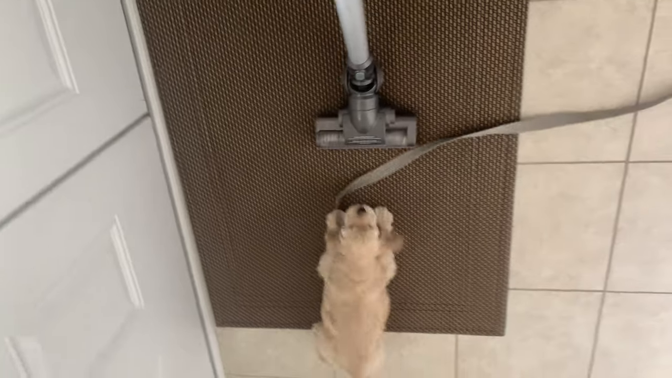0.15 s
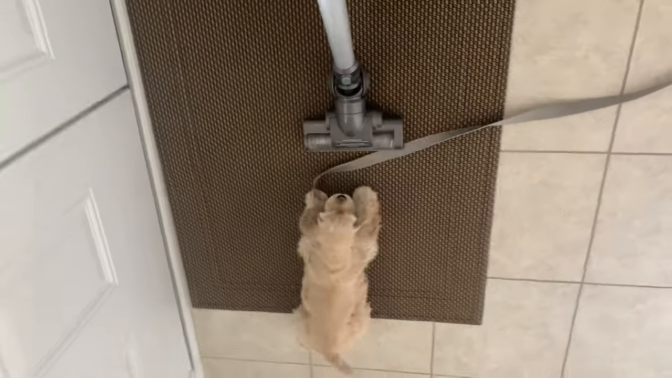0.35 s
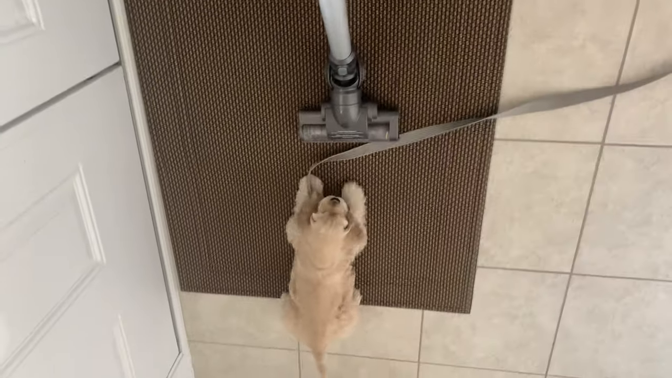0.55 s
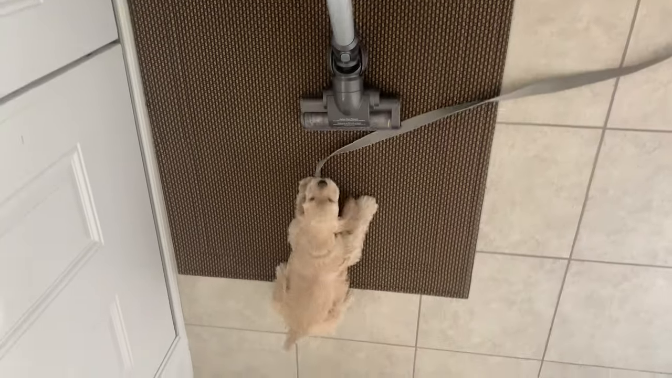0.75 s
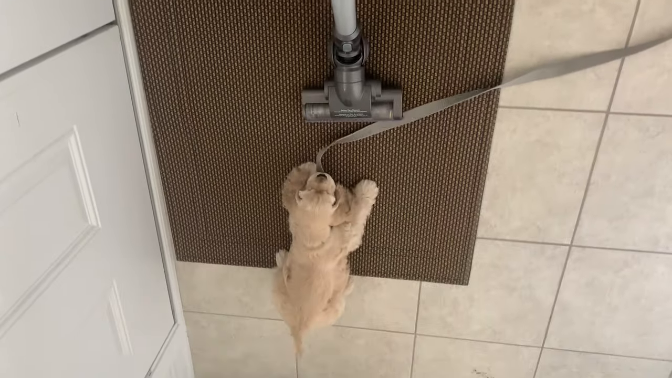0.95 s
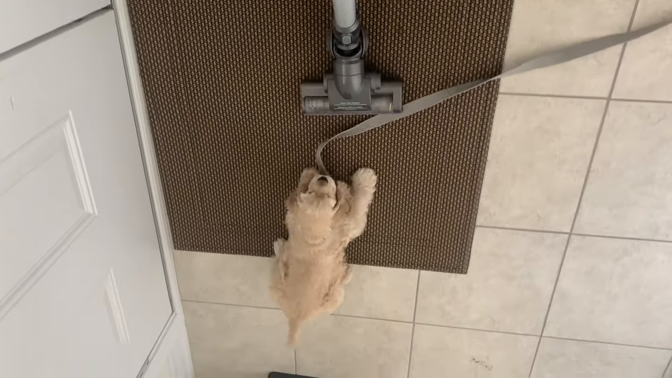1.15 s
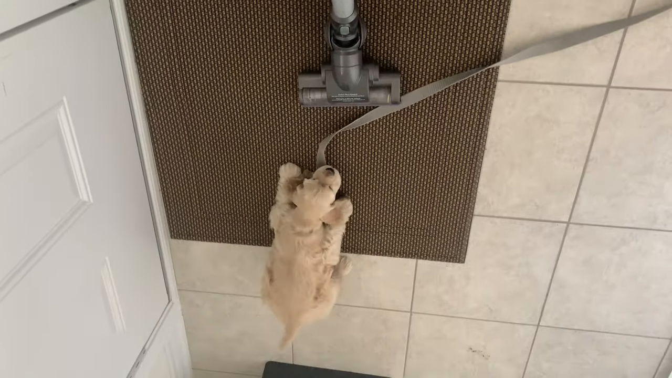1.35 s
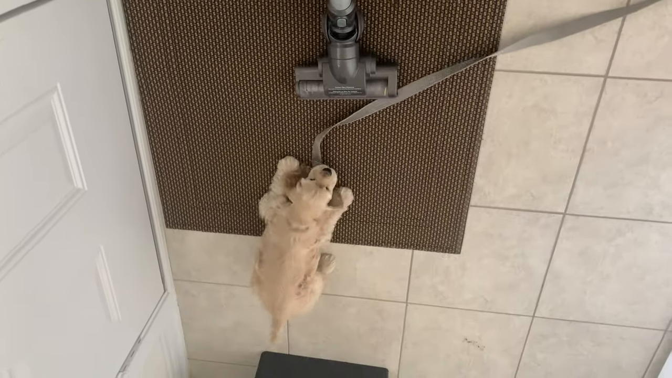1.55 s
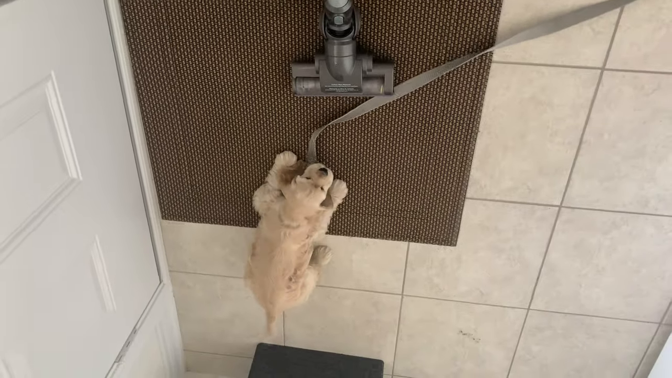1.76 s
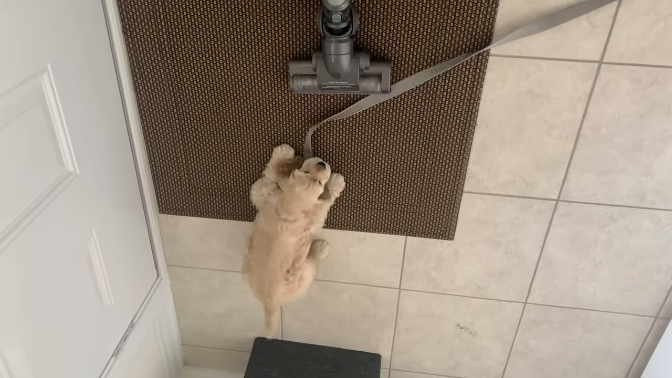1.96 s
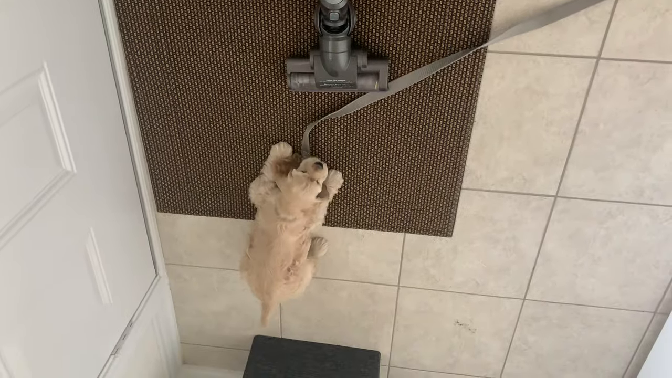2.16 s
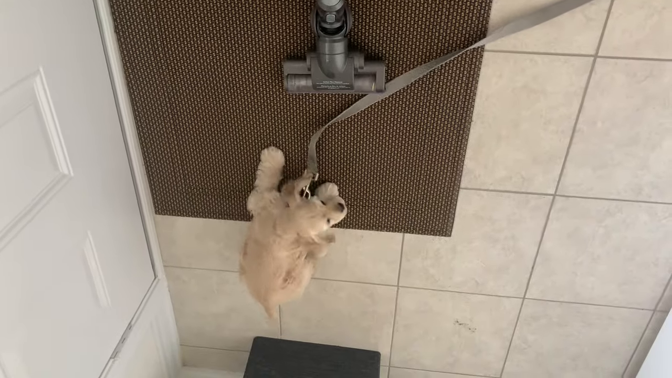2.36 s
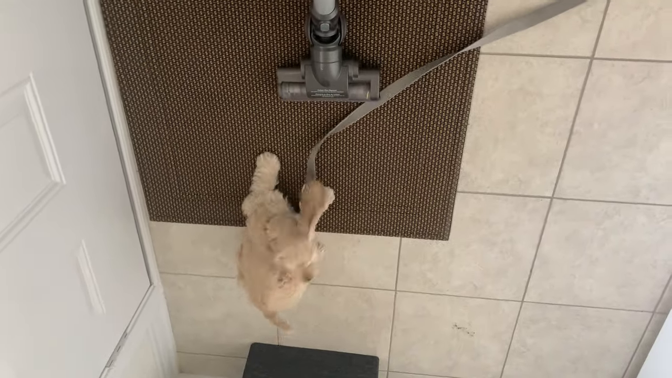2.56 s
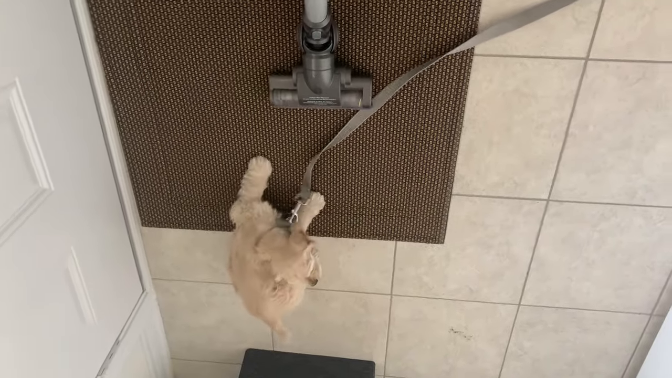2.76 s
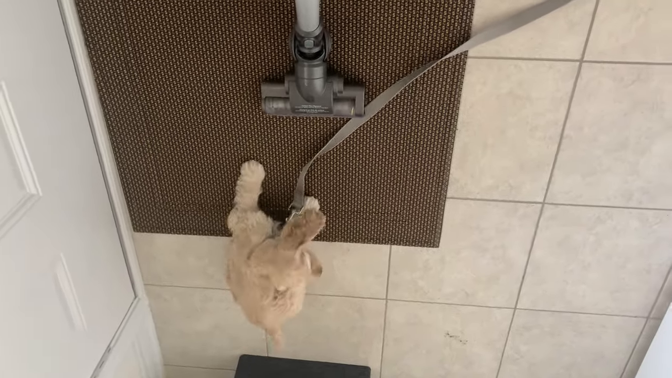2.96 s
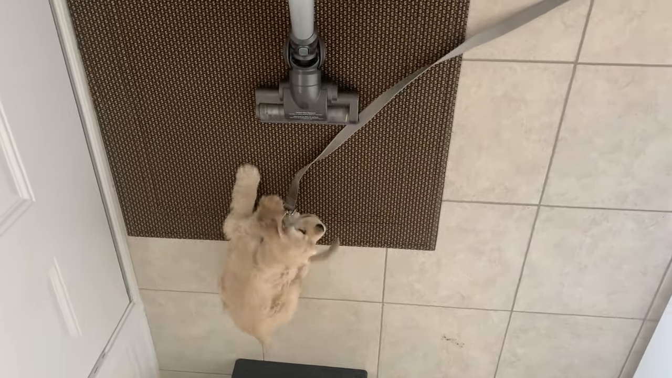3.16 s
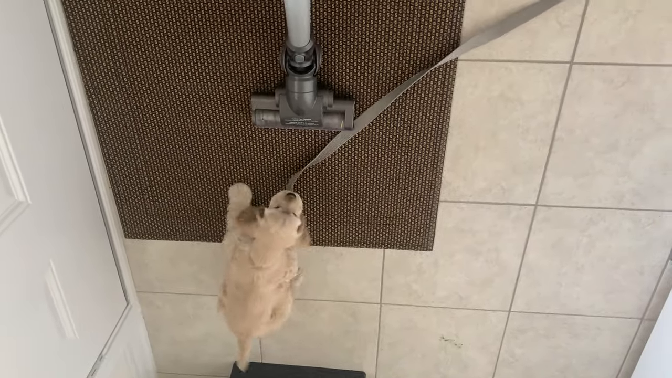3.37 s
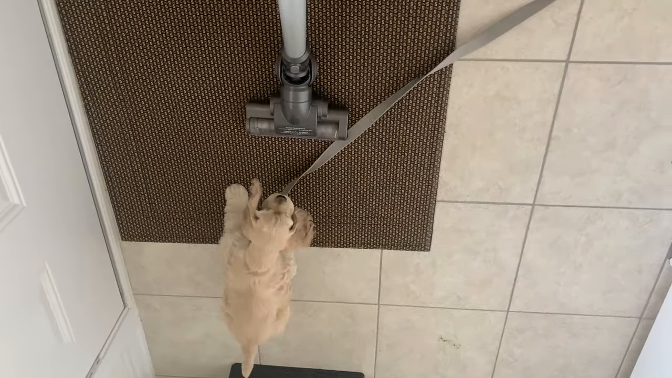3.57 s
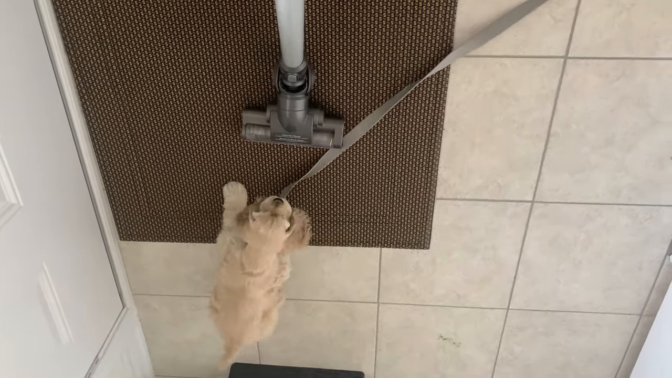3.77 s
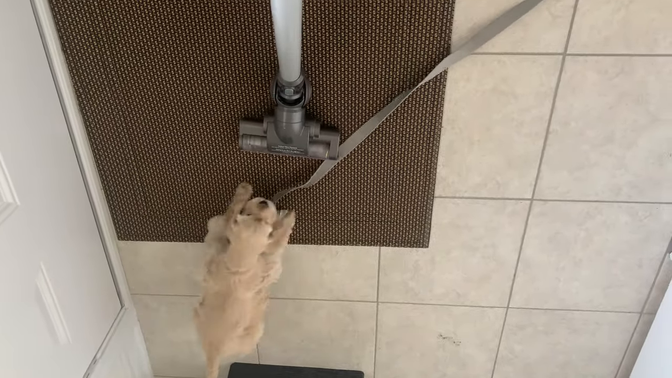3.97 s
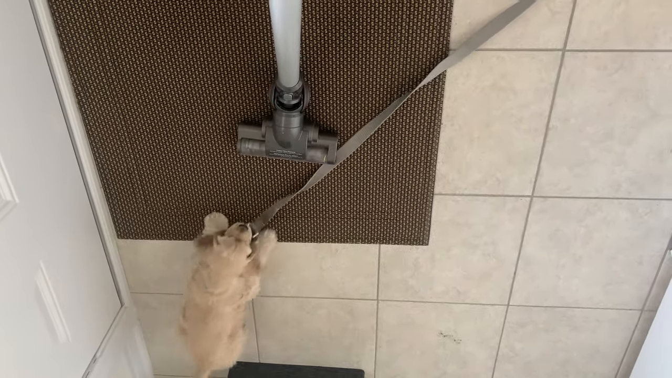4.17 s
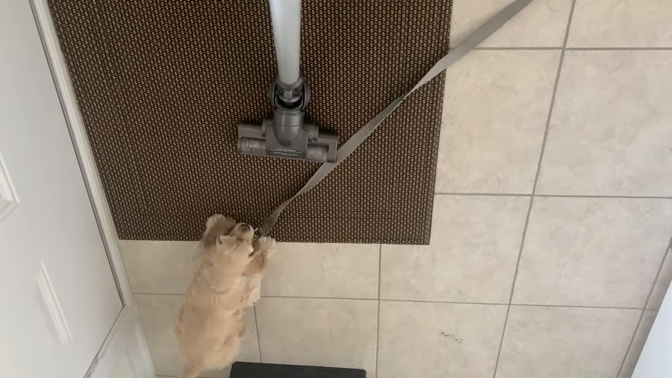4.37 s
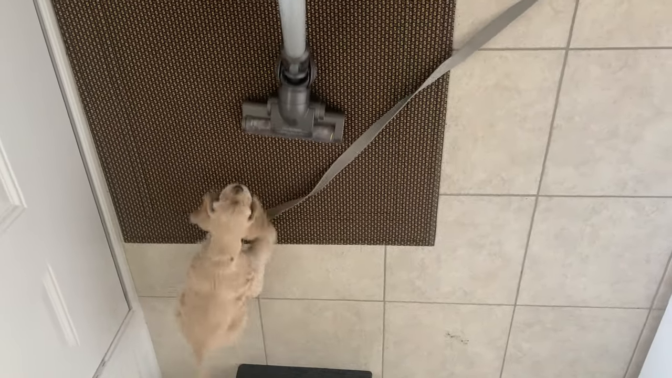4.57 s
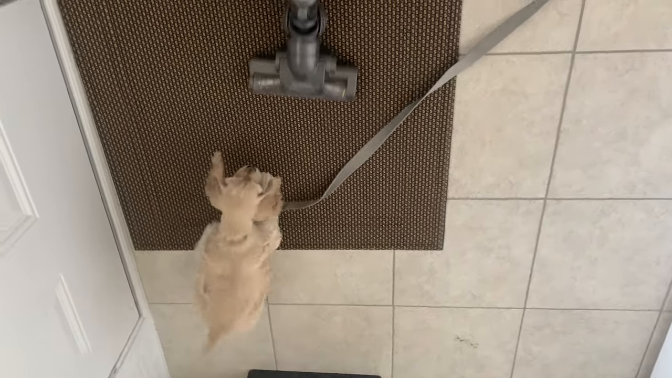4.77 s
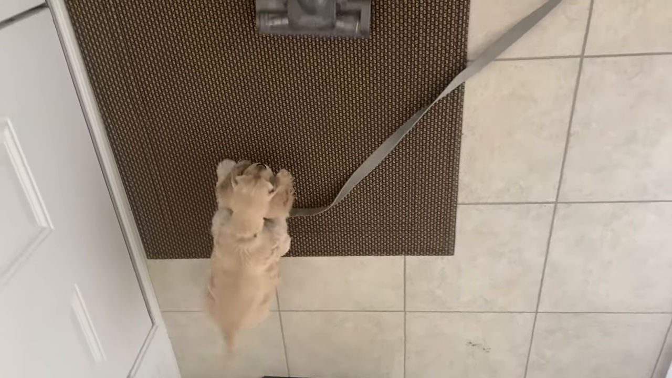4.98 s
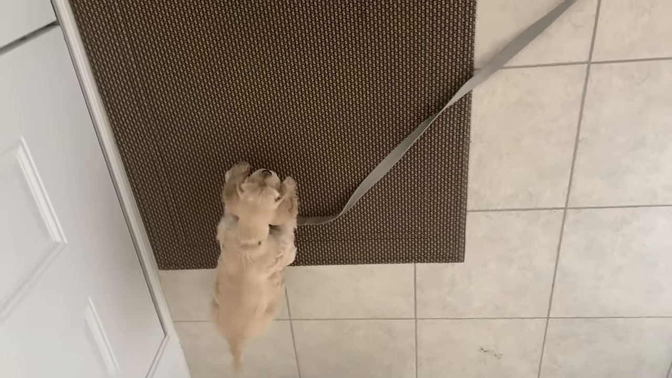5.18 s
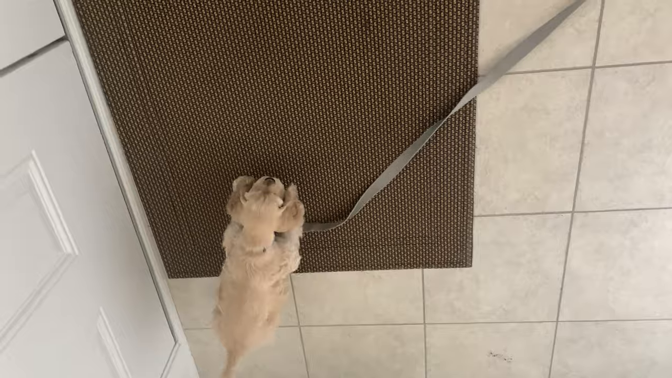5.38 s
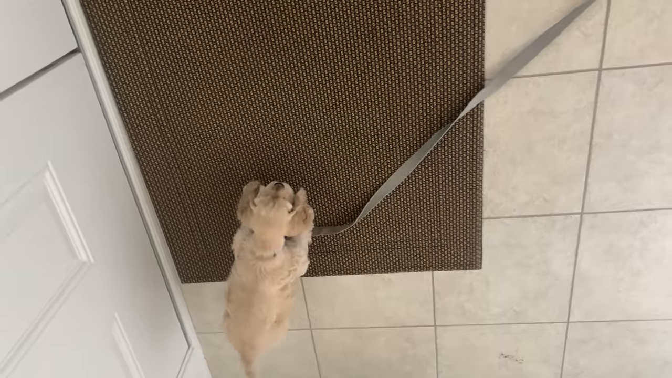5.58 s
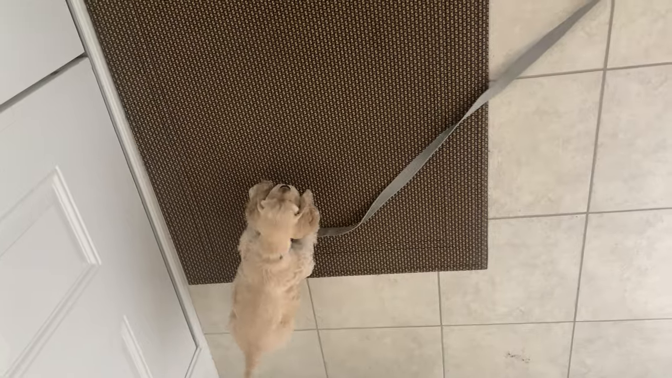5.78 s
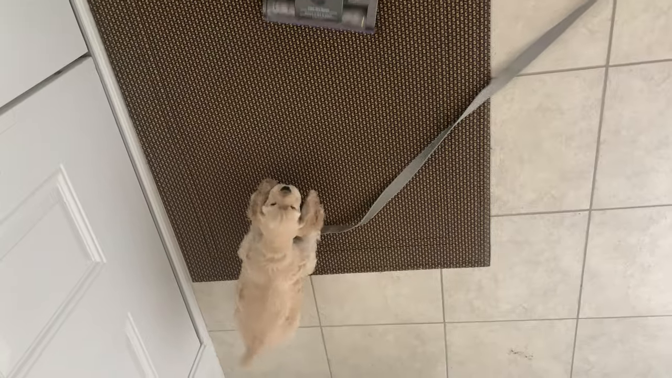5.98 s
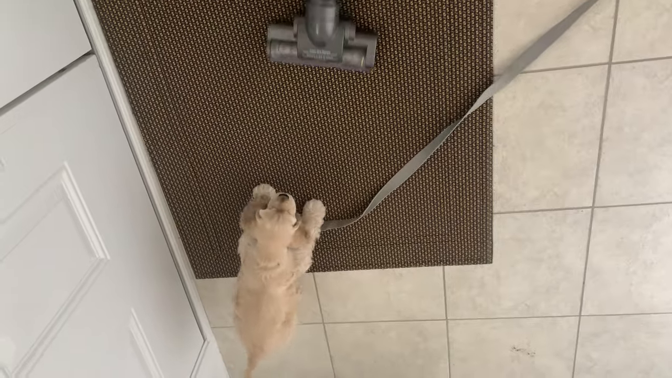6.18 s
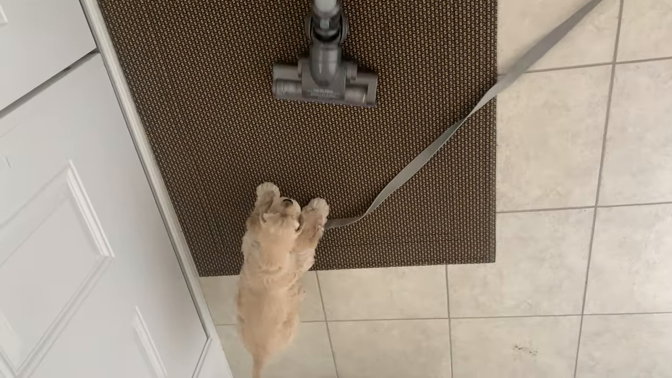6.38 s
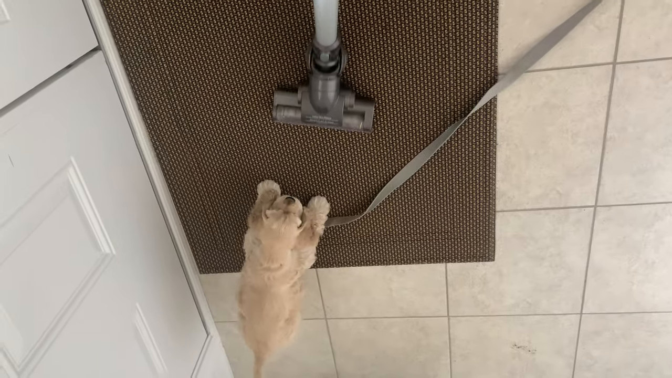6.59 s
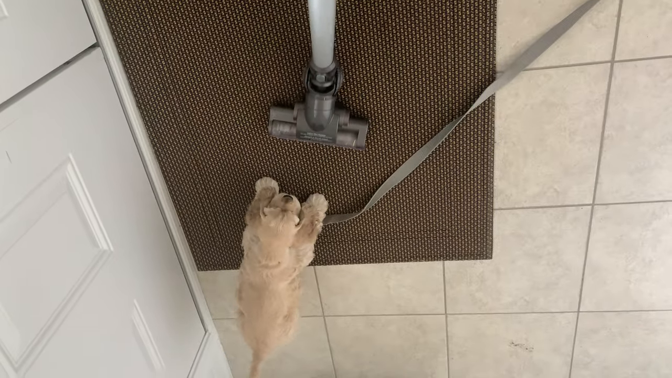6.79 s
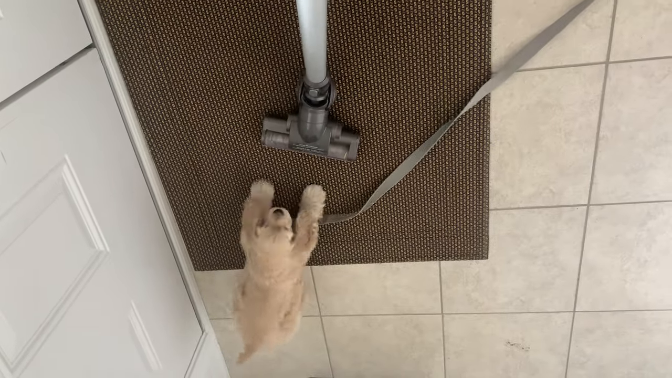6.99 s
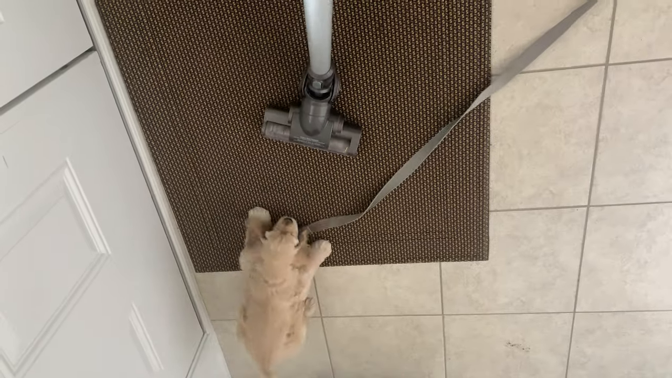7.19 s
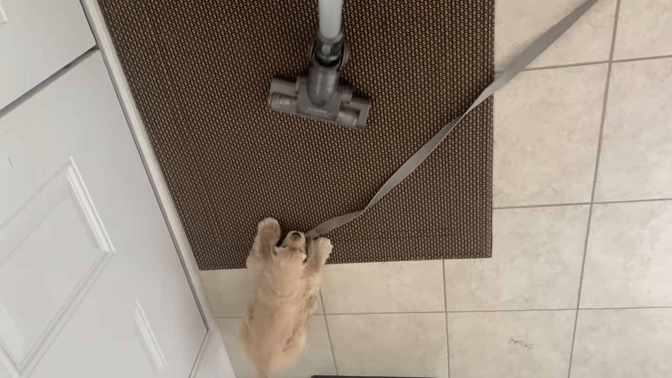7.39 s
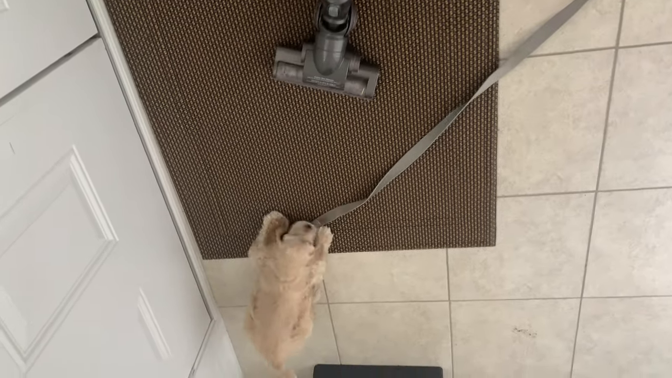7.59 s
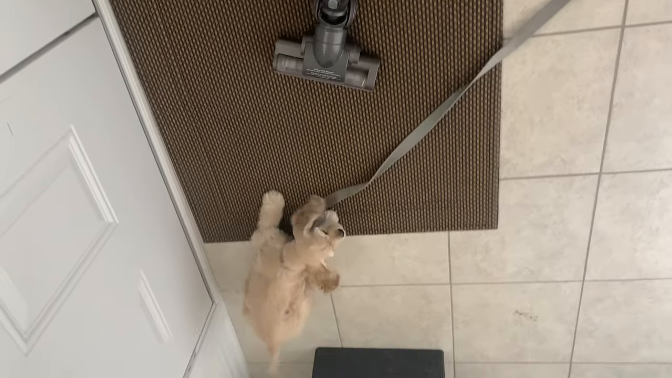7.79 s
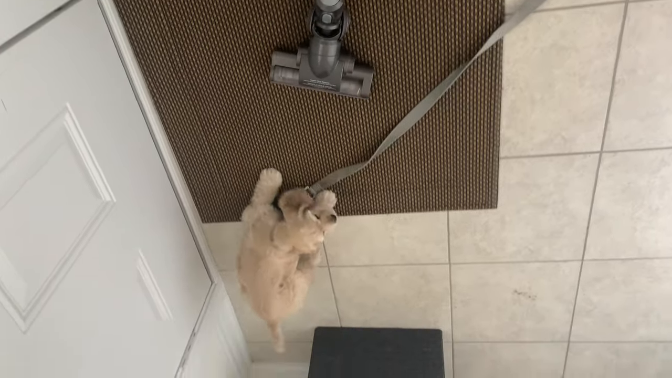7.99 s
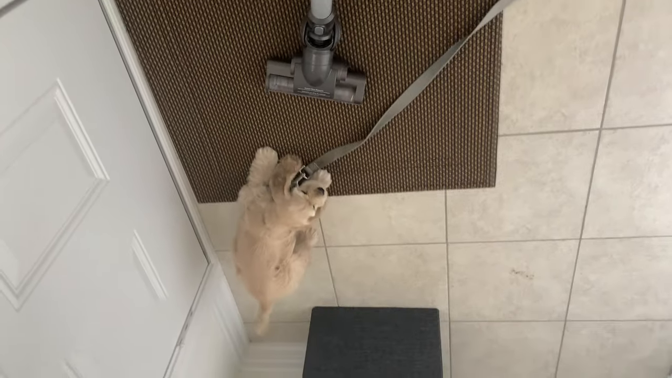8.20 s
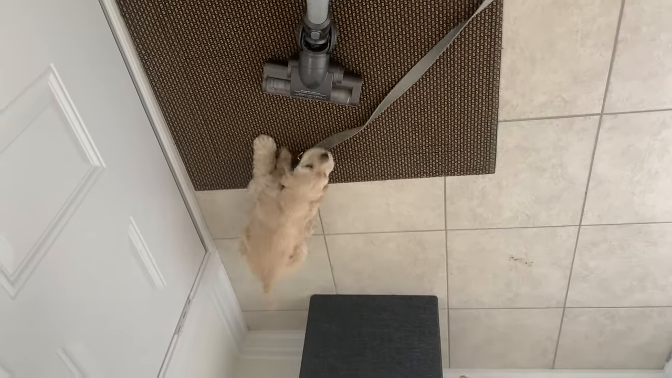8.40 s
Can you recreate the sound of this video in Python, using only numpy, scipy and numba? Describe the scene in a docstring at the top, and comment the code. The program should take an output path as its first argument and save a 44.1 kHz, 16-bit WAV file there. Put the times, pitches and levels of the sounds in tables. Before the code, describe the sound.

A young dog yaps at a running vacuum indoors. The yaps are very short, high and hoarse, rising fast then dropping, loud above the machine, with a brief hard-walled echo. The vacuum's high hiss and faint whine never stop; they surge around four and seven seconds and thin out between. Faint low drones mark the nozzle dragging on the mat. Phone stereo, moderately close.

```python
"""A small tiled hallway, where a puppy yaps eleven times at a running vacuum cleaner.
Each yap is an uneven pulse train filtered by moving resonances of throat and mouth; the walls ring after it.
Shaped noise gives the air hissing into the floor nozzle as it is pushed near and drawn back, and the motor's
roar further off; sines give the whine of the fan and the hum of the motor, and narrow noise the dragging nozzle.
A phone's stereo pair hears it all with a phase and level difference for each source."""
import sys
import numpy as np
from scipy import signal
from scipy.fft import rfft, irfft, next_fast_len
from scipy.io import wavfile
from scipy.ndimage import uniform_filter1d
from numba import njit

SR = 44100
rng = np.random.default_rng(int(sys.argv[2]) if len(sys.argv) > 2 else 0)


def master(y):
    """Save y as 16-bit WAV."""
    cut = np.clip(np.atleast_2d(y).T, -1, 1)
    pcm = np.round(cut * 32767)  # scale
    wavfile.write(sys.argv[1], SR, pcm.astype(np.int16))


N = 372204
TIME = np.arange(N) / SR  # s
OPPOSITE = np.array([[1], [-1]])  # signs of a left-right difference


def undb(db):
    """Logarithmic level: decibels to an amplitude gain."""
    return 10 ** (np.asarray(db) / 20)


def unit(x):
    """Normalisation: scale to rms 1."""
    return x / np.sqrt(np.mean(x ** 2))


def walk(rate):
    """Slow random modulation: levels held 1 / rate s, smoothed by two moving averages, at rms 1."""
    hold = int(SR / rate)
    steps = np.repeat(rng.standard_normal(N // hold + 1), hold)
    smooth = uniform_filter1d(uniform_filter1d(steps, hold), hold)
    return unit(smooth[:N])


def coloured(points):
    """Spectral shaping: Gaussian noise of rms 1 whose density follows (frequency [Hz], level [dB]) points."""
    hz, db = np.transpose(points)
    f = np.fft.rfftfreq(next_fast_len(N + N % 2) * 2, 1 / SR) + 1  # 1 Hz up, to keep the logarithm finite
    gain = undb(np.interp(np.log(f), np.log(hz), db))
    spectrum = rng.standard_normal(len(f)) + 1j * rng.standard_normal(len(f))
    return unit(irfft(gain * spectrum)[:N])


def butter(x, hz, kind, order=2):
    """Maximally flat filtering: a Butterworth low-pass or high-pass."""
    sos = signal.butter(order, min(hz, SR / 2 - 1), kind, fs=SR, output="sos")
    return signal.sosfilt(sos, x)


@njit
def resonate(x, hz, width):
    """Damped resonance: a state-variable band-pass with moving centre and width, gain 1 at the centre."""
    y, b, l = np.empty(len(x)), 0., 0.
    for i in range(len(x)):
        g, damping = np.tan(np.pi * hz[i] / SR), width[i] / hz[i]
        v = (b + g * (x[i] - l)) / (1 + g * (g + damping))
        b, l, y[i] = 2 * v - b, l + 2 * g * v, damping * v
    return y


def band(x, hz, width_hz):
    """Damped resonance whose centre and width are constants or curves."""
    return resonate(x, hz * np.ones(len(x)), width_hz * np.ones(len(x)))


def steady(x, span_s=0.0096):
    """Envelope normalisation: hold the short-term rms at 1, keeping the faster grain."""
    power = np.abs(uniform_filter1d(x ** 2, int(span_s * SR)))
    return x / np.sqrt(power + 1e-12)


def formant(source, hz, width_hz):
    """Resonance of an air passage: two equal band-passes in cascade for steep sides, at rms 1."""
    return steady(band(band(source, hz, width_hz), hz, width_hz))


def airflow(points, apart):
    """Turbulence noise with partial coherence: the bass is alike on both sides, the rest partly differs."""
    middle = coloured(points)
    side = butter(coloured(points), 260, "high", order=1)
    return unit(middle + apart * side * OPPOSITE)


def hallway(x, direct_db=-3.0, early_db=-9, early_t60=0.028, tail_db=-8.0, t60=0.65,
            echo_db=-11, echo_s=0.052, echo_t60=0.4, apart=0.81, wet_db=0):
    """Reverberation: direct sound, early reflections off door and tiles, a slap between the ends, a diffuse tail."""
    t = np.arange(SR) / SR
    mid, side = rng.standard_normal((2, 2, SR))
    early, late = (m + apart * s * OPPOSITE for m, s in zip(mid, side))
    sparse = rng.random(SR) < .02
    early = early * sparse * undb(-60 * t / early_t60) * (t > .002)
    tail = late * undb(-60 * t / t60)
    tail = tail * np.clip(t / 0.00097, 0, 1)  # the tail takes about 1 ms to build up
    bounce_s = echo_s * np.maximum(np.round(t / echo_s), 1)  # time of the nearest bounce
    slap = late * np.exp(-((t - bounce_s) / 0.00033) ** 2) * undb(-60 * t / echo_t60)
    response = undb(early_db) * unit(early) + undb(tail_db) * unit(tail) + undb(echo_db) * unit(slap)
    response = response / np.sqrt(SR)
    reflected = signal.fftconvolve(np.atleast_2d(x), response, axes=1)[:, :N]
    return undb(direct_db) * x + undb(wet_db) * reflected


def moving_air(suction_db, near_db, hiss_db=2.5, roar_db=-31.0, roar_follow=0.52):
    """Turbulence: broadband hiss at the nozzle, roar of motor and hose, and air singing at the nozzle's lip."""
    # hiss at the nozzle: (frequency [Hz], relative density [dB per Hz])
    nozzle_spectrum = [(1500, -25), (4500, -7), (7100, 1.5), (8100, 7.5), (9100, 5.5), (10200, 5.5),
                       (11500, 1), (12400, 3.5), (13300, 3), (14500, -1), (16000, -2.5)]
    # roar of motor and hose: (frequency [Hz], relative density [dB per Hz])
    roar_spectrum = [(25, -45), (60, -3), (120, -7.5), (200, 0), (290, 0), (370, 5), (520, 2.5), (850, 5.5),
                     (1300, 4), (1700, 2.5), (2350, 8), (2750, 6.5), (3400, 10.3), (4350, 0), (5300, 8),
                     (6500, 0), (9000, -10)]
    # air singing under the nozzle's lip: (centre [Hz], width of each filter [Hz], level at mean nearness [dB])
    lip_bands = [(6620, 1100, -45.5), (7870, 800, -49)]
    hiss, roar = airflow(nozzle_spectrum, apart=.15), airflow(roar_spectrum, apart=.17)
    hiss = hiss * undb(suction_db + hiss_db + .5 * walk(18))
    roar = roar * undb(roar_db + roar_follow * near_db + 0.33 * walk(11))
    lip = sum(undb(db) * formant(rng.standard_normal(N), hz, width) for hz, width, db in lip_bands)
    lip = lip * undb(2 * near_db)  # so it stands out only at close range
    return hallway(hiss + roar + lip, direct_db=-.7, wet_db=-3.5, apart=.1)


def motor(near_db, whine_follow=0.72):
    """Rotating-machine tones: fan partials at multiples of the blade rate, and a hum of two harmonics."""
    # fan whine: (multiple of the blade rate [1], relative level [dB])
    whine_partials = [(1, -45), (2, -52), (5, -51), (7, -51), (8, -57), (9, -52), (13, -61)]
    # motor hum: (time [s], relative level [dB])
    hum_levels = [(0, -50), (1.6, -49), (3.9, -42.5), (5, -49), (8.44, -56)]
    blade_hz, motor_hz = 1132, 732  # at nominal speed
    # the motor wavers, and slows a little under load
    speed = 1 + .0004 * (walk(4) + walk(50)) - .0002 * near_db
    turn = 2 * np.pi * np.cumsum(speed) / SR  # phase of a 1 Hz tone at this speed
    whine = sum(np.sin(k * blade_hz * turn) * undb(db + 2.2 * walk(9)) for k, db in whine_partials)
    hum = np.sin(motor_hz * turn) + .5 * np.sin(2 * motor_hz * turn)
    hum = hum * undb(np.interp(TIME, *np.transpose(hum_levels)) + 2.8 * walk(9))
    return whine * undb(whine_follow * near_db) + hum


def vacuum():
    """Level follows distance: hiss, roar and whine swell as the nozzle nears; hum and drags keep their own."""
    # air drawn into the nozzle: (time [s], relative level [dB])
    suction = [(0.0, -34.5), (0.26, -34), (0.75, -33), (0.82, -37), (0.99, -36), (1.06, -33.5), (1.67, -35),
               (3.69, -31.5), (4.18, -29.5), (4.44, -29.5), (4.79, -38.5), (4.84, -34.5), (5.55, -40),
               (7.05, -29.5), (7.21, -32.5), (7.8, -35.5), (8.44, -32.5)]
    suction_db = np.interp(TIME, *np.transpose(suction))
    near_db = suction_db - np.mean(suction_db)
    return moving_air(suction_db, near_db) + motor(near_db) + drags()


@njit
def folds(hz, jitter, shimmer, chance):
    """Relaxation oscillation: a pulse at each closing of the vocal folds, every cycle of its own length and size."""
    pulses, phase, p, k = np.zeros(len(hz) + 1), np.empty(len(hz)), 0., 0
    for i in range(len(hz)):
        step = hz[i] * np.exp(jitter[i] * chance[k, 0]) / SR
        p += step
        if p >= 1:
            p, k = p - 1, k + 1
            size = np.exp(shimmer[i] * chance[k, 1])
            # share the pulse between two samples, to place it between them
            pulses[i] += size * p / step
            pulses[i + 1] += size * (1 - p / step)
        phase[i] = p
    return pulses[:-1], phase


def yap(points, t, chance, attack_s=0.0053, release_s=0.025, leak_db=-3.0, flutter=.045, rattle=0.083,
        chest_hz=727.0, chest_db=-8.0, half_db=-14):
    """Source and filter: air lifts the pitch, the folds turn raspy, the closing jaw lowers the resonances."""
    times, *controls = np.transpose(points)
    hz, rough, throat_db, mouth_hz, mouth_db, top_db = (np.interp(t, times, c) for c in controls)
    rough = np.clip(rough, .15, 1)
    # soft tissue flaps, shaking the pitch, the resonances and the flow of air
    flap = rough * unit(butter(chance[:len(t), 3:].T, 110, "low"))
    shake = np.exp(flutter * flap)
    pulses, phase = folds(hz * shake[0], .11 * rough, .6 * rough, chance)
    # the strained folds swell every fourth cycle, which sets partials between the harmonics
    swell = np.exp(.85 * np.sqrt(rough) * np.cos(np.unwrap(2 * np.pi * phase) / 4))
    # air rushes through once a cycle
    air = unit(np.exp(-2 * phase) * chance[:len(t), 2])
    source = swell * (unit(pulses) + .65 * np.sqrt(rough) * air)
    # the throat resonance follows half the pitch's swing about its rest frequency
    rest_hz, follow = 1035, 0.5
    throat_hz = (rest_hz + follow * (hz - rest_hz)) * shake[1]
    throat = undb(throat_db) * formant(source, throat_hz, 350 + 350 * rough)
    mouth = undb(mouth_db) * formant(source, mouth_hz * shake[2], 393.0)
    # the top resonance rides above the mouth's, and sinks no lower than 2760 Hz
    top = undb(top_db) * formant(source, np.maximum(1.527 * mouth_hz, 2760), 330.0)
    # a rough voice adds a chesty body and a hoarse band between throat and mouth
    chest = undb(throat_db + chest_db) * formant(source, chest_hz, 170.0)
    rasp = undb((throat_db + mouth_db) / 2 + leak_db) * formant(source, 1275, 580)
    # a half-broken one adds an undertone at half its pitch
    undertone = 2 * (1 - rough) * undb(throat_db + half_db) * formant(source, hz / 2, 99.0)
    voice = throat + mouth + top + rough * (chest + rasp + undertone)
    rise = np.minimum(t - times[0], 0) / attack_s
    fall = np.maximum(t - times[-1], 0) / release_s
    flow = np.exp(rise - fall) * np.exp(rattle * flap[0])
    return butter(voice * flow, 4380, "low", order=8)


def puppy():
    """Superposition: each yap is voiced within 0.2 s of its middle and added at its own time."""
    # one list per yap: (time [s], pitch [Hz], roughness [1], throat resonance [dB],
    # mouth resonance [Hz], mouth resonance [dB], top resonance [dB])
    yap_curves = [
        [(0.198, 627.6, 0.2, -45, 1260, -27, -32), (0.216, 902.5, 0.23, -14, 2330, -16, -36),
         (0.235, 925, 0.48, -19.5, 2080, -20, -23), (0.271, 897, 0.5, -26, 1570, -15, -30),
         (0.284, 780, 0.97, -20, 1500, -28, -43)],
        [(0.745, 859, 0.54, -25.5, 2650, -33, -41), (0.766, 871, 0.2, -16, 2400, -26, -32),
         (0.774, 992, 0.38, -8.5, 2420, -22, -30), (0.8, 975.6, 0.17, -12, 2140, -17, -23),
         (0.828, 973, 0.85, -24.5, 1790, -22.0, -40)],
        [(1.291, 757, 0.22, -26, 1950, -29, -27), (1.312, 885, 0.24, -11.5, 2100, -14.5, -48),
         (1.345, 906, 0.72, -24, 1890, -15.5, -23), (1.39, 792, 1.02, -20, 1500, -29.5, -41)],
        [(2.275, 761, 0.38, -24, 2580, -35, -46), (2.297, 879, 0.37, -13.5, 2350, -32, -35),
         (2.316, 1098, 0.65, -13.5, 2350, -18, -20), (2.338, 896, 0.78, -24, 2070, -17, -29),
         (2.358, 876, 0.8, -21, 1880, -12.5, -41), (2.397, 720, 0.71, -21.5, 1510, -18.5, -50)],
        [(3.232, 718.5, 0.36, -29, 2230, -35, -39), (3.275, 870, 0.56, -16.5, 2180, -18, -25),
         (3.297, 870, 0.5, -18, 2130, -19, -25), (3.318, 848, 0.77, -20.5, 1760, -15.5, -28),
         (3.345, 795, 1.02, -30, 1440, -18, -30)],
        [(3.925, 718, 0.65, -28, 2320, -28, -44.0), (3.962, 975.6, 0.55, -18.5, 1970, -15, -24.5),
         (4.005, 944, 0.94, -22.5, 1730, -16.5, -33), (4.04, 766, 0.8, -25, 1560, -20, -42)],
        [(4.512, 647.2, 0.17, -38, 1290, -25, -37.5), (4.531, 890, 0.3, -13.5, 2400, -22, -42),
         (4.542, 1139, 0.65, -11.5, 2220, -16.5, -22), (4.58, 1003, 0.85, -21, 1930, -21.5, -26),
         (4.635, 717, 1.01, -27.5, 1670, -26, -54)],
        [(6.018, 702.4, 0.27, -30, 2120, -38.0, -42), (6.042, 886.4, 0.35, -13, 2090, -21.5, -40),
         (6.073, 1082, 0.66, -20, 2200, -15.5, -25.5), (6.1, 844, 0.97, -24.5, 1770, -14, -31),
         (6.135, 705, 0.5, -26.5, 1350, -23, -43)],
        [(7.05, 795.5, 0.75, -25.5, 2280, -32, -56), (7.103, 1040, 0.86, -15.5, 2330, -13, -26),
         (7.135, 1007, 0.8, -24, 2050, -23, -35), (7.175, 761, 0.62, -26, 1560, -21, -50)],
        [(7.683, 857, 0.67, -25, 2300, -33, -35.0), (7.705, 993.6, 0.72, -20, 2170, -16.5, -39),
         (7.738, 1032, 0.8, -12.5, 2100, -20, -26), (7.765, 720.7, 0.3, -20.5, 1960, -23, -36),
         (7.797, 961, 0.77, -18, 1900, -22, -38), (7.822, 779, 0.62, -17, 1320, -36.5, -32)],
        [(8.375, 772, 0.5, -26.5, 2320, -42, -40), (8.405, 1062, 0.54, -22, 2250, -21, -30),
         (8.438, 1164, 0.35, -9, 2380, -17, -29)],
    ]
    out = np.zeros(N)
    for points in yap_curves:
        middle_s = (points[0][0] + points[-1][0]) / 2
        now = np.abs(TIME - middle_s) < .2
        out[now] += yap(points, TIME[now], rng.standard_normal((SR // 2, 6)))
    return out


def drags(span_s=0.091, width_hz=22.0):
    """Cavity resonance: as it drags over the mat, the hollow nozzle drones softly for a moment."""
    # drags: (time of the peak [s], resonance [Hz], level [dB])
    mat_drags = [(4.96, 161, -50), (5.22, 214, -48.5), (6.93, 226, -45)]
    out = 0
    for s, hz, db in mat_drags:
        drone = unit(band(rng.standard_normal(N), hz, width_hz))
        out = out + drone * undb(db) * np.exp(-((TIME - s) / span_s) ** 2)
    return out


def wall_ringing(voice):
    """Standing waves: the voice excites narrow modes between the hallway walls."""
    # modes: (frequency [Hz], width [Hz], level [dB])
    modes = [(682, 9.3, 5.5), (1242, 12, 2), (1670, 6.6, -20)]
    return sum(undb(db) * band(voice, hz, width) for hz, width, db in modes)


def microphones(x, phase_points, pan_db):
    """Interchannel difference: the stereo pair turns the phase and tilts the level between the channels."""
    size = next_fast_len(N + SR // 10, real=True)
    lead = np.interp(np.fft.rfftfreq(size, 1 / SR), *np.transpose(phase_points))
    half = np.array([[.5], [-.5]])  # half the difference to each side
    turned = irfft(rfft(x, size) * np.exp(1j * lead * half), size)[:, :N]
    return turned * undb(pan_db * half)


def scene():
    """Superposition: the vacuum cleaner and the puppy in the hallway, each with its own phase at the pair."""
    # phase by which the left microphone leads the right: (frequency [Hz], phase [rad])
    dog_phase = [(0, 0), (750, -.85), (1400, -.3), (2300, .9), (2750, .3), (3200, 1.5), (3800, 1.4),
                 (4600, 3.14)]
    vacuum_phase = [(0, 0), (750, -.8), (1250, -.1), (2600, 2.5), (3700, 1.3), (4350, 2.9), (4900, 3.35),
                    (6400, 6), (15500, 19.1)]
    voice = puppy()
    dog = microphones(hallway(voice) + wall_ringing(voice), dog_phase, pan_db=-1.0)
    return dog + microphones(vacuum(), vacuum_phase, pan_db=-0.5)


def record(dry):
    """Band limiting: the phone cuts the top with a steep elliptic low-pass at 15.8 kHz."""
    sos = signal.ellip(10, .2, 80, 15800, fs=SR, output="sos")
    return signal.sosfilt(sos, dry)


dry = scene()
out = record(dry)
master(out)
```